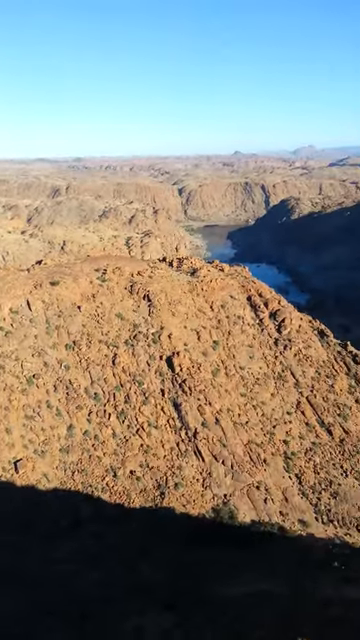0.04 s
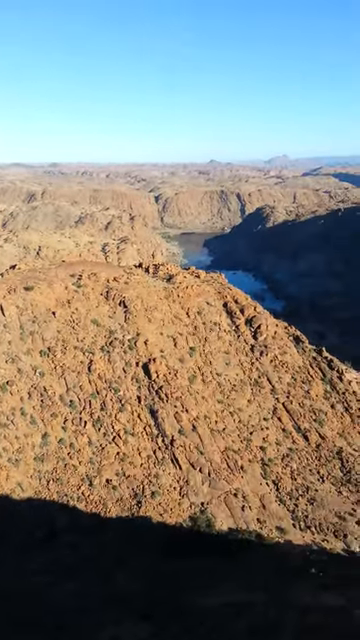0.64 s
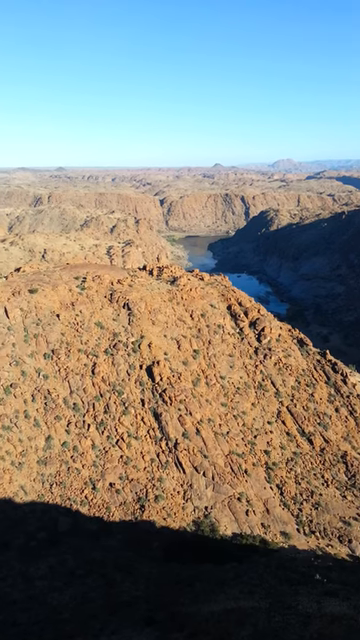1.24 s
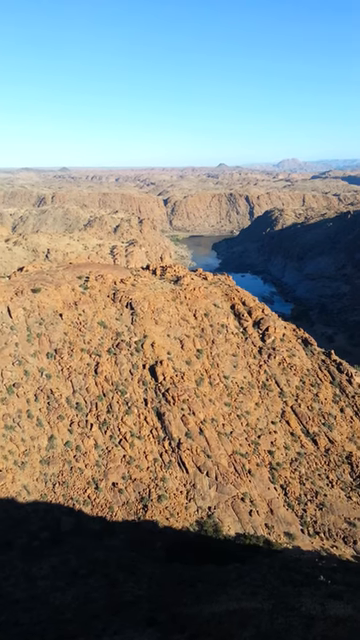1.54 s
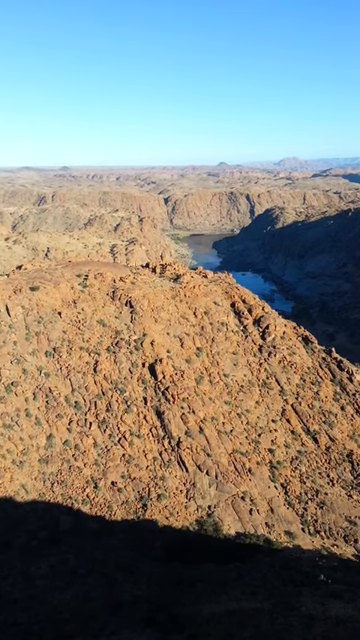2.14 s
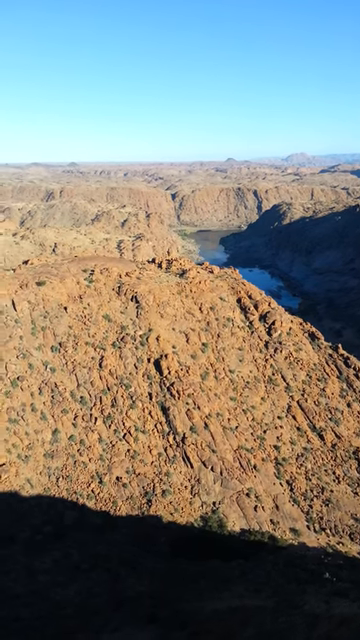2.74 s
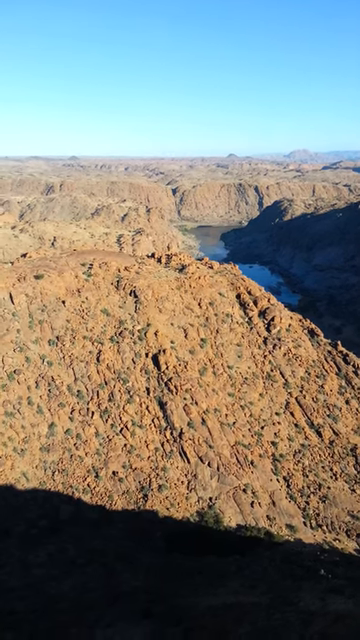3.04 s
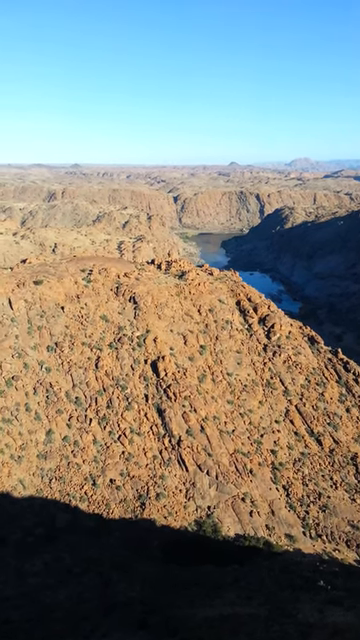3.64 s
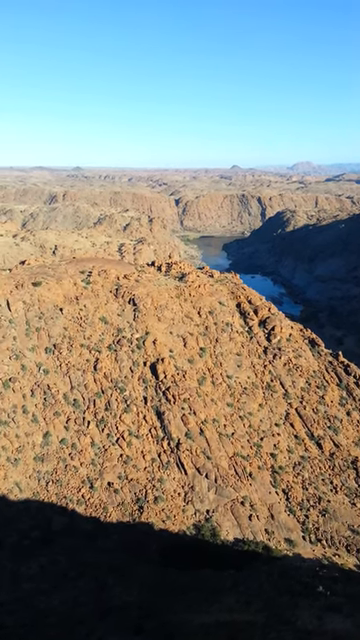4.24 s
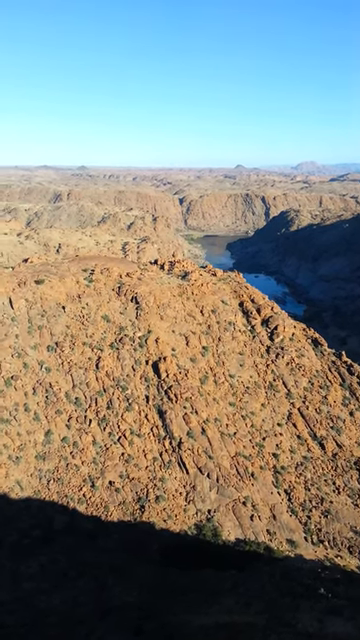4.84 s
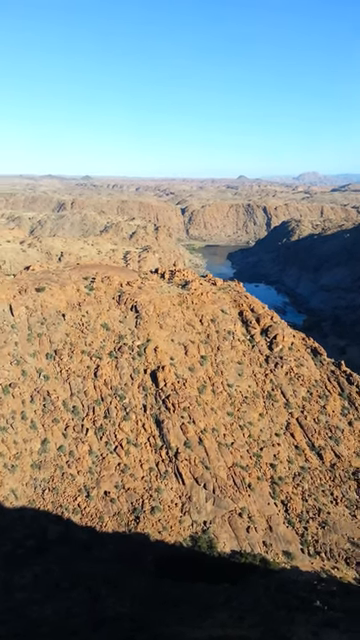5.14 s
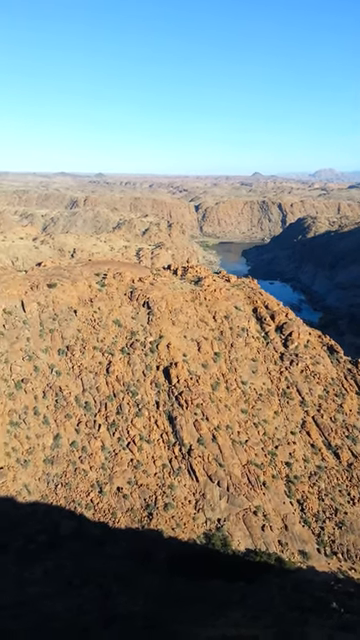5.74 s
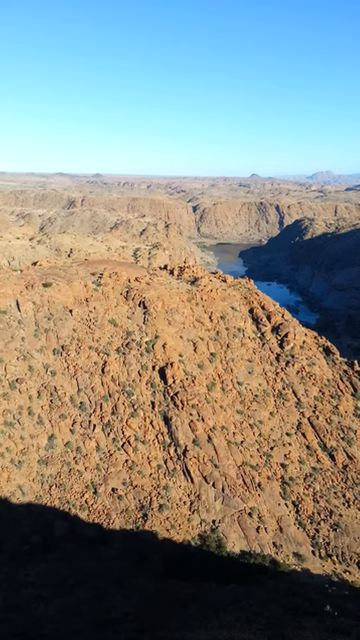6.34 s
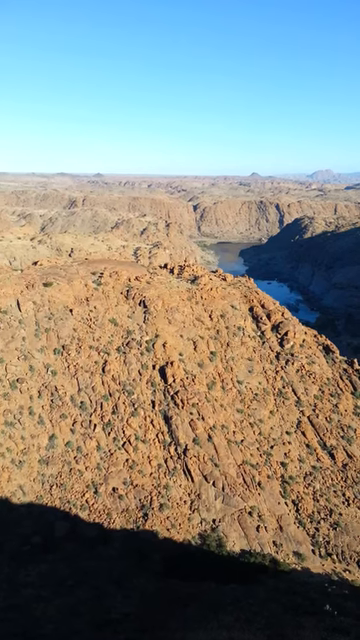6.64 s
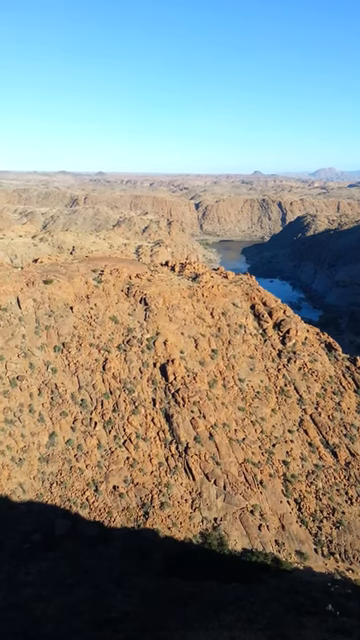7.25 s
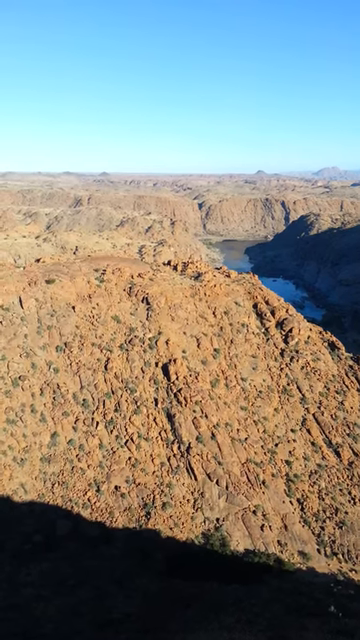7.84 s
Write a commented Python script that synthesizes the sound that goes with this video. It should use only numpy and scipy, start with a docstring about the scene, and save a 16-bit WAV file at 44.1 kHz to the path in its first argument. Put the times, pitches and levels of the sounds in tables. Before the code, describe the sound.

In still, open air, a hot-air balloon burner gives four loud blasts close over a stereo microphone, the first already under way and the last still going at the end. The flame roars and flutters under a bright gas hiss that softens just before each shutoff. Every relight thumps and briefly distorts. The pauses hold only a fading high ring of leftover gas and the soft rush and faint whistle of the pilot flame.

```python
"""A propane burner is already roaring, close above a stereo microphone in the basket of a hot-air balloon.
Three more blasts follow in the still, open air. Each lights with a thump and a surge that overloads
the microphone, then settles to a turbulent roar under the hiss of the gas jets, which fades as the valve
is eased shut. Between blasts the pilot flame keeps rushing, with a faint breathy whistle."""
import sys
import numpy as np
from scipy import signal
from scipy.fft import irfft, next_fast_len
from scipy.io import wavfile

SR = 44100
rng = np.random.default_rng(int(sys.argv[2]) if len(sys.argv) > 2 else 0)


def wrap_up_sound(samples):
    """Save the sound to the file named by the first command line argument, as 16-bit audio."""
    columns = np.atleast_2d(samples).T
    # keep every value between -1 and 1, then stretch to whole-number steps
    tamed = np.clip(columns, -1, 1)
    steps = np.round(tamed * 32767).astype(np.int16)
    wavfile.write(sys.argv[1], SR, steps)


N = 356328
TIME = np.arange(N) / SR
FFT_SIZE = next_fast_len(N)
FREQS = np.maximum(np.arange(FFT_SIZE // 2 + 1) * SR / FFT_SIZE, 1)

# How alike the two microphone ports sound: frequency_hz, direct_power_share
PORT_LIKENESS = [(40, .8), (130, .97), (400, .99), (1000, .93), (1800, .83), (2700, .6), (4000, .5),
                 (6000, .3), (7800, .5), (10000, .12), (14000, .1)]
# Balance between the ports: frequency_hz, left_over_right_db
PORT_BALANCE = [(150, -1), (330, -1), (500, .5), (620, -1), (850, 3.5), (1050, 0), (1450, 4.5), (1900, 0),
                (2700, -1.5), (3500, -3), (4300, .5), (5200, -.7), (7000, 2), (9000, 0), (10800, 2.5),
                (12800, -2.5), (14300, 0)]
# Sound bends round the casing to reach the left port: frequency_hz, lag_ms
LEFT_PORT_LAG = [(400, .16), (1000, .225), (1600, .245), (2500, .225), (4200, .236), (7200, .213)]
# One dull echo off the basket to each port, left then right: delay_ms, gain
BASKET_ECHOES = [(7.8, .2), (8.5, .2)]

# Tone of the pilot's flame and of its gas stream: frequency_hz, relative_db
PILOT_FLAME_SPECTRUM = [(20, -60), (45, -44), (70, -29.5), (100, -18), (140, -9.5), (190, -6), (260, -1.3),
                        (310, -2.5), (390, .5), (470, -.5), (560, -4), (700, -5), (1000, -13), (1200, -19),
                        (3000, -32)]
PILOT_HISS_SPECTRUM = [(600, -12), (1000, -1), (1220, -3), (1500, 2), (1750, 1.3), (2000, -1.3),
                       (2300, 5.5), (2650, -.5), (3450, -3), (4400, 0), (5400, 0), (6300, -4.5), (7800, -5),
                       (9500, -13), (10300, -10), (11700, -23), (13200, -13), (14500, -21)]
# Resonances of the pilot tube: pitch_hz, width_hz, over_hiss_db
PILOT_TUBE_MODES = [(850, 70, 3), (1400, 100, 6), (4410, 80, 0)]
# The pilot flares up: centre_s, half_length_s, flame_db, hiss_db
PILOT_FLARE_UPS = [(3.92, .2, 1.6, 0), (6.2, .16, 1.6, 2.3), (6.52, .05, 3.5, 1)]

# Tone of the main flame and of its gas jets: frequency_hz, relative_db
ROAR_SPECTRUM = [(20, -44), (45, -35), (70, -28), (100, -22), (140, -13), (190, -8), (260, -1.5), (380, 0),
                 (480, -1), (550, -4.5), (680, -5), (1000, -13.7), (1600, -17.3), (2700, -25), (9000, -45)]
JET_SPECTRUM = [(500, -20), (1500, -7), (1800, -5), (2100, -1.3), (2700, -5), (3400, -1), (3800, -3),
                (4350, 1), (5100, .4), (5900, -4.7), (7800, -6.2), (9500, -10.4), (11700, -16.5),
                (13400, -13.5)]
# Resonances of the burner can: pitch_hz, width_hz, over_hiss_db
BURNER_CAN_MODES = [(1580, 130, 3), (3020, 170, -1), (4230, 120, -5)]
# Brief swells and dips of the burner: centre_s, half_length_s, flame_db, jet_db
BURNER_WAVERS = [(.08, .12, -.8, -1.2), (.275, .04, -3.5, -2), (.5, .13, 1, 0), (.635, .025, -2, -3.5),
                 (.86, .06, -1.5, -1.5), (1.48, .1, 0, 1.3), (3.43, .07, 1.5, 0), (7.3, .12, -1.3, -.4)]
# Each opening of the blast valve, eased off just before it shuts:
# open_s, close_s, ease_s, jet_db, flame_surge_db, jet_surge_db, jet_crest_s, thump_db, leak_db
VALVE_BLASTS = [(-1.0, 2.008, .47, -17.9, 0, 0, .066, -40, -34.8),
                (2.52, 3.628, .36, -17.3, 8.5, 10.3, .062, -12, -40),
                (4.445, 5.72, .5, -17.3, 11.5, 10, .068, -12, -38.5),
                (6.622, 8.6, .5, -17, 8.3, 9.5, .072, 4, -37)]


def from_db(db):
    """Decibels to gain."""
    return 10 ** (np.asarray(db) / 20)


def unit_power(x):
    """Scale to a mean square of 1."""
    return x / np.sqrt(np.mean(x ** 2))


def over_hz(points):
    """A table joined by straight lines in log frequency."""
    hz, value = np.transpose(points)
    return np.interp(np.log(FREQS), np.log(hz), value)


def resonance(pitch_hz, width_hz):
    """Gain of one resonance: 1 on top, half at about width_hz to either side."""
    return 1 / (1 + ((FREQS ** 2 - pitch_hz ** 2) / (2 * width_hz * FREQS)) ** 2)


def cavity(modes):
    """Gain of a hollow body whose resonances add power to the hiss inside it."""
    peaks = sum(from_db(db) * resonance(pitch_hz, width_hz) for pitch_hz, width_hz, db in modes)
    return np.hypot(1, peaks)


def bump(centre_s, half_length_s):
    """A smooth hump of height 1."""
    return np.exp(-((TIME - centre_s) / half_length_s) ** 2)


def swells(rows):
    """Gains of a flame and of its hiss, from a table of brief swells and dips."""
    return from_db(sum(np.outer(dbs, bump(centre_s, half_s)) for centre_s, half_s, *dbs in rows))


def white(bins=len(FREQS)):
    """Spectrum of fresh white noise."""
    return rng.standard_normal(2 * bins).view(complex)


def eddies(rate_hz, depth_db):
    """Gain that wanders as turbulent eddies pass."""
    slow_hz = FREQS[:FFT_SIZE // 20]
    spectrum = white(len(slow_hz)) / (1 + (slow_hz / rate_hz) ** 2)
    wander = unit_power(irfft(spectrum, FFT_SIZE // 10))
    return np.interp(TIME, np.linspace(0, FFT_SIZE / SR, len(wander)), from_db(depth_db * wander))


def microphone_ports(echo_cut_hz=1100):
    """Direct and scattered gain at each port: the right hears first, the treble arrives scattered."""
    direct_share = over_hz(PORT_LIKENESS)
    phase_per_ms = -2j * np.pi * FREQS / 1000
    lags_ms = (over_hz(LEFT_PORT_LAG), 0)
    ports = []
    for side, lag_ms, (echo_ms, echo_gain) in zip((1, -1), lags_ms, BASKET_ECHOES):
        echo = echo_gain * np.exp(phase_per_ms * echo_ms) / (1 + (FREQS / echo_cut_hz) ** 2)
        colour = (1 + echo) * from_db(side * over_hz(PORT_BALANCE) / 2)
        direct = colour * np.sqrt(direct_share) * np.exp(phase_per_ms * lag_ms)
        scattered = colour * np.sqrt(1 - direct_share)
        ports.append((direct, scattered))
    return ports


def turbulence(colour, ports):
    """Rushing noise of a given colour as both ports hear it, at unit power."""
    source = white()
    spectra = [colour * (direct * source + scattered * white()) for direct, scattered in ports]
    return unit_power(irfft(spectra, FFT_SIZE)[:, :N])


def pilot(ports, flame_db=-34, hiss_db=-35.9):
    """A small flame burns throughout, its gas stream hissing through the pilot tube."""
    flame_flare, hiss_flare = swells(PILOT_FLARE_UPS)
    flame = turbulence(from_db(over_hz(PILOT_FLAME_SPECTRUM)), ports) * eddies(rate_hz=12, depth_db=.5)
    hiss = turbulence(from_db(over_hz(PILOT_HISS_SPECTRUM)) * cavity(PILOT_TUBE_MODES), ports)
    hiss *= eddies(rate_hz=40, depth_db=.5)
    return from_db(flame_db) * flame_flare * flame + from_db(hiss_db) * hiss_flare * hiss


def pilot_whistle(ports, level_db=-40.8, pan_right_db=3):
    """Gas whistles unevenly at the pilot's orifice, heard a little to the right."""
    direct_only = [(direct, 0) for direct, _ in ports]
    whistle = turbulence(resonance(pitch_hz=2910, width_hz=85), direct_only)
    whistle *= eddies(rate_hz=10, depth_db=1.2)
    pan = from_db(pan_right_db * np.array([[-.5], [.5]]))
    return from_db(level_db) * pan * whistle


def coil_bleed(ports, t60_s=2.2):
    """Gas left in the coil sings briefly through the jets after the valve shuts."""
    leak = sum((TIME > close_s) * from_db(leak_db - 60 * np.maximum(TIME - close_s, 0) / t60_s)
               for _, close_s, *_, leak_db in VALVE_BLASTS)
    singing = turbulence(resonance(pitch_hz=5470, width_hz=260), ports)
    return leak * singing * eddies(rate_hz=14, depth_db=2.2)


def ignition(ports, delay_s=.037):
    """The first cloud of gas catches all at once, with a low thump."""
    puffs = sum(from_db(thump_db) * bump(open_s + delay_s, half_length_s=.009)
                for open_s, *_, thump_db, _ in VALVE_BLASTS)
    return puffs * turbulence(resonance(pitch_hz=230, width_hz=85), ports)


def gas_flow(open_s, close_s, surge_db, rise_s, crest_s, t60_s, sharpness=2.1):
    """The flow swells as the valve opens, overshoots, settles, and dies away once it shuts."""
    age_s = np.maximum(TIME - open_s, 0)
    swell = np.minimum(age_s / rise_s, 1) ** 2
    overshoot_db = surge_db * (age_s / crest_s * np.exp(1 - age_s / crest_s)) ** sharpness
    decay_db = -60 * np.maximum(TIME - close_s, 0) / t60_s
    return swell * from_db(overshoot_db + decay_db)


def burner(ports, flame_db=-11, eased_flame_db=.9, eased_jet_db=-5.7):
    """The big flame roars and flutters; its jets hiss and spit, and soften as the valve is eased."""
    flame_gain, jet_gain = 0, 0
    for open_s, close_s, ease_s, jet_db, flame_surge_db, jet_surge_db, jet_crest_s, *_ in VALVE_BLASTS:
        eased = np.clip(1 + (TIME - close_s) / ease_s, 0, 1)
        flame_flow = gas_flow(open_s, close_s, flame_surge_db, rise_s=.038, crest_s=.066, t60_s=.28)
        jet_flow = gas_flow(open_s, close_s, jet_surge_db, rise_s=.036, crest_s=jet_crest_s, t60_s=.29)
        flame_gain += from_db(flame_db + eased_flame_db * eased) * flame_flow
        jet_gain += from_db(jet_db + eased_jet_db * eased) * jet_flow
    flame_waver, jet_waver = swells(BURNER_WAVERS)
    roar = turbulence(from_db(over_hz(ROAR_SPECTRUM)), ports) * eddies(rate_hz=25, depth_db=.4)
    hiss = turbulence(from_db(over_hz(JET_SPECTRUM)) * cavity(BURNER_CAN_MODES), ports)
    hiss *= eddies(rate_hz=24, depth_db=.85) * eddies(rate_hz=300, depth_db=.7)
    return flame_gain * flame_waver * roar + jet_gain * jet_waver * hiss


def scene():
    """Everything sounds from the burner frame just overhead; the open sky adds no reverberation."""
    ports = microphone_ports()
    return burner(ports) + ignition(ports) + pilot(ports) + pilot_whistle(ports) + coil_bleed(ports)


def record(dry):
    """This close, the surges clip the microphone hard; a steep low-pass cuts the highest treble."""
    full_scale, cutoff_hz = .98, 14600
    clipped = np.clip(dry, -full_scale, full_scale)
    lowpass = signal.ellip(12, .1, 70, cutoff_hz, fs=SR, output="sos")
    return signal.sosfilt(lowpass, clipped)


dry = scene()
out = record(dry)
wrap_up_sound(out)
```